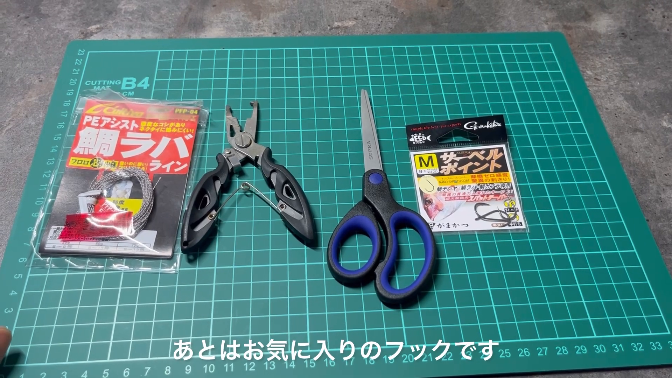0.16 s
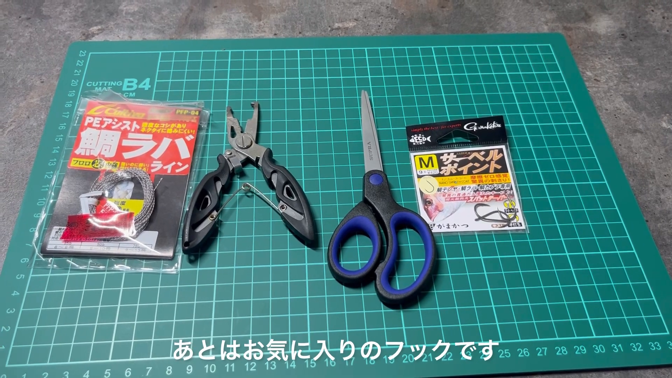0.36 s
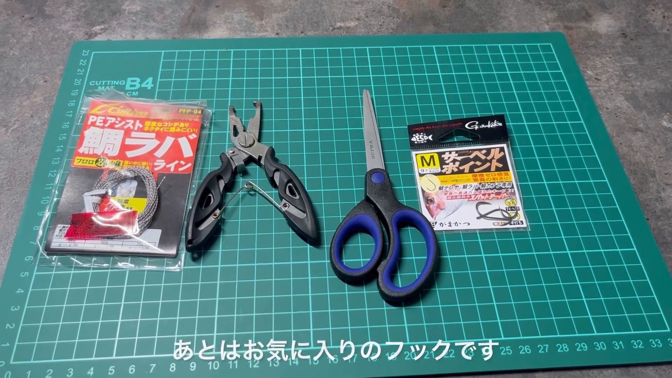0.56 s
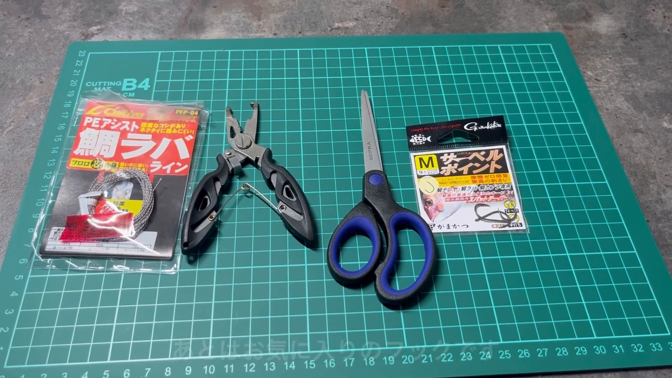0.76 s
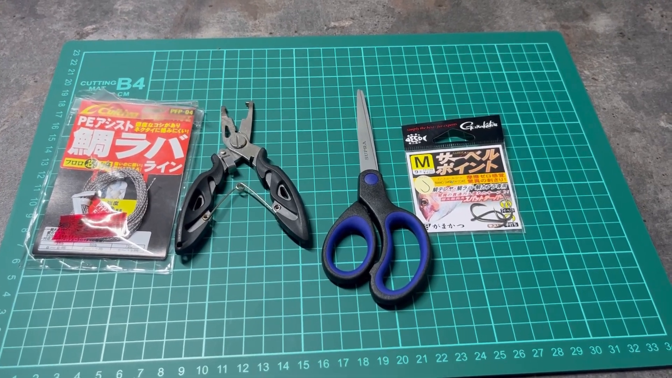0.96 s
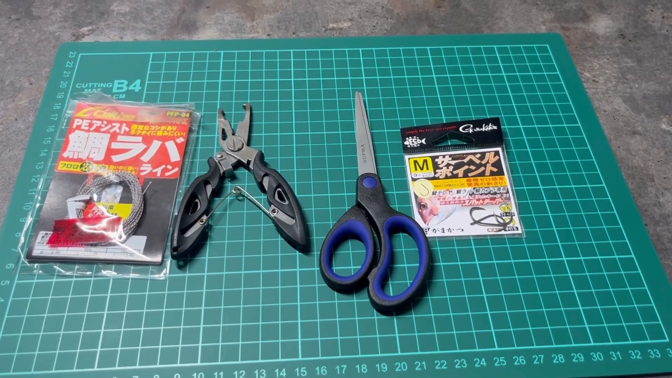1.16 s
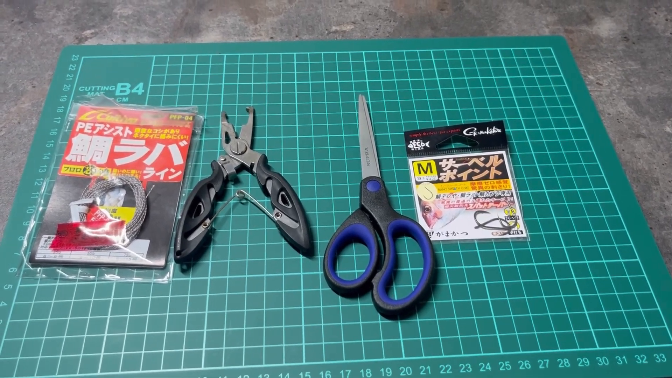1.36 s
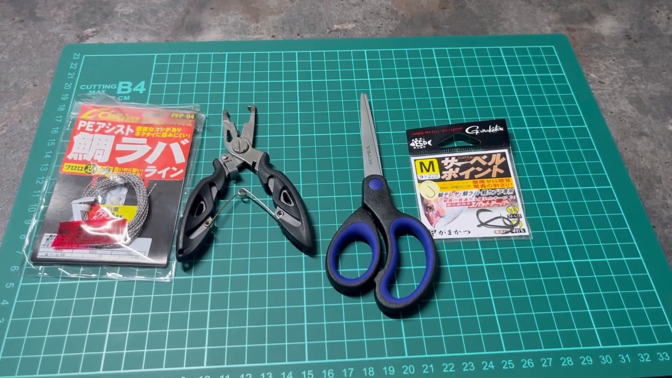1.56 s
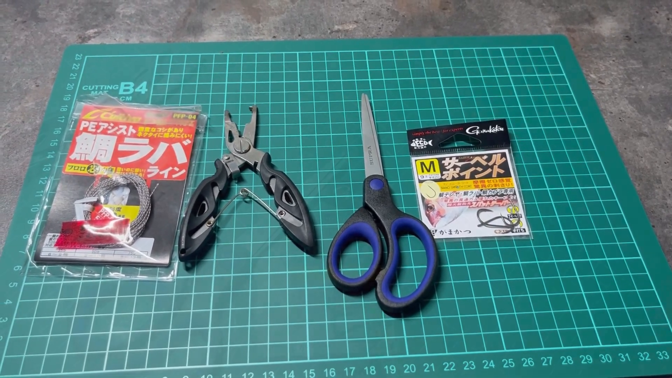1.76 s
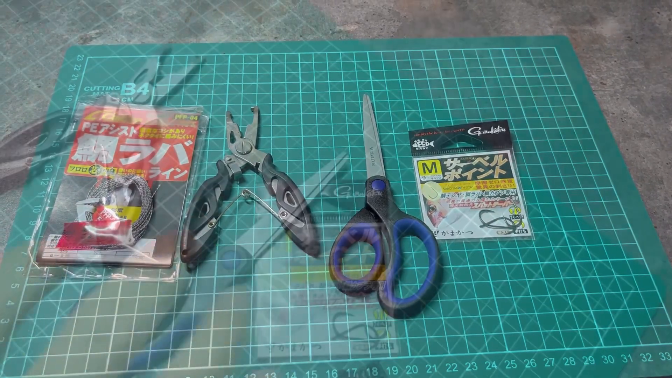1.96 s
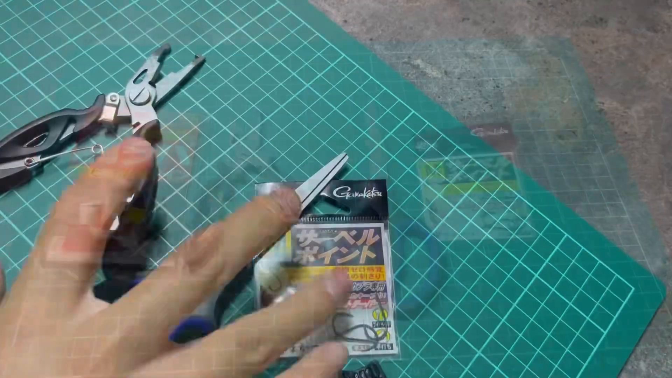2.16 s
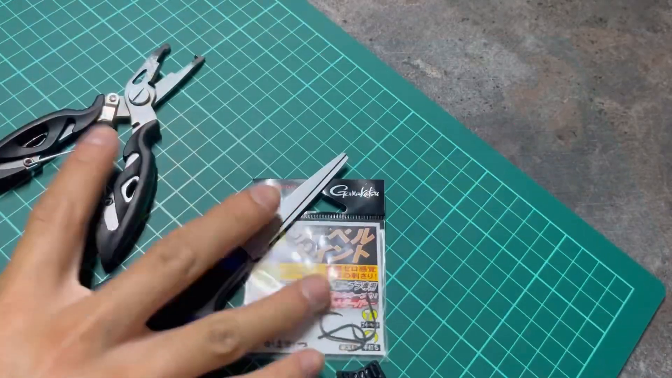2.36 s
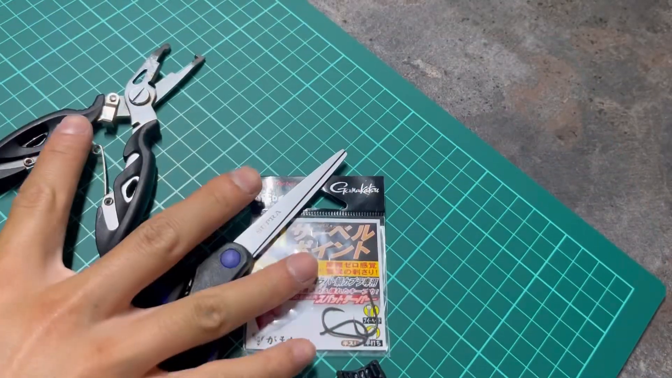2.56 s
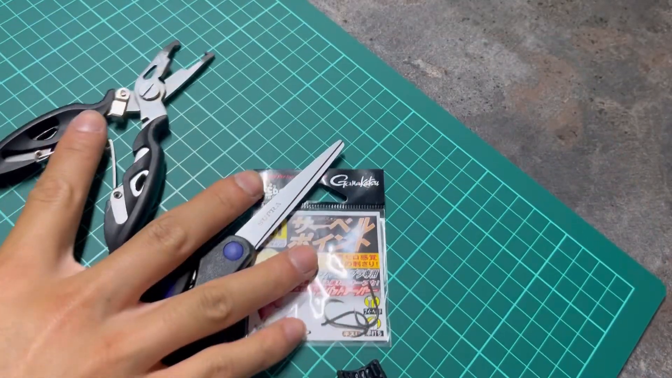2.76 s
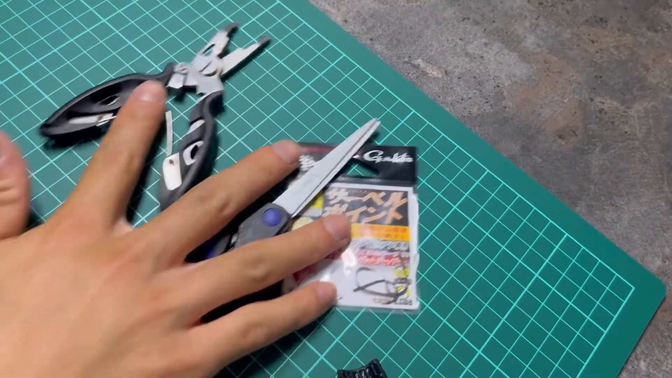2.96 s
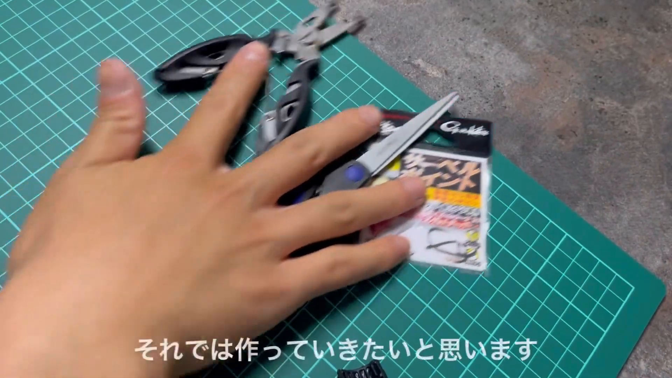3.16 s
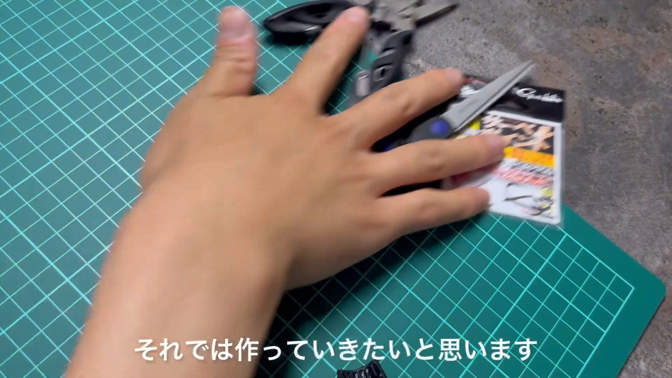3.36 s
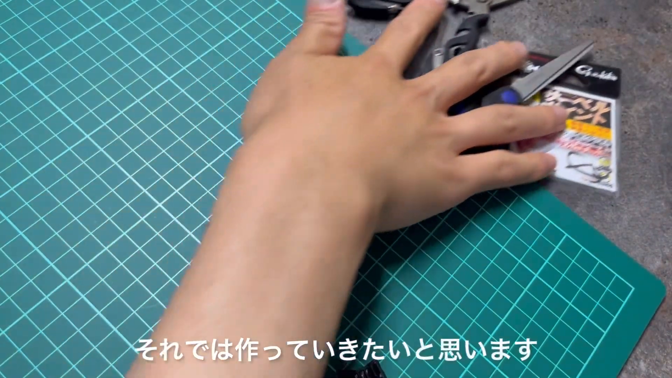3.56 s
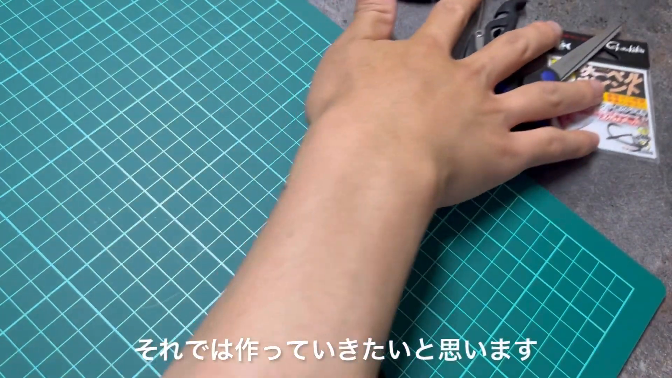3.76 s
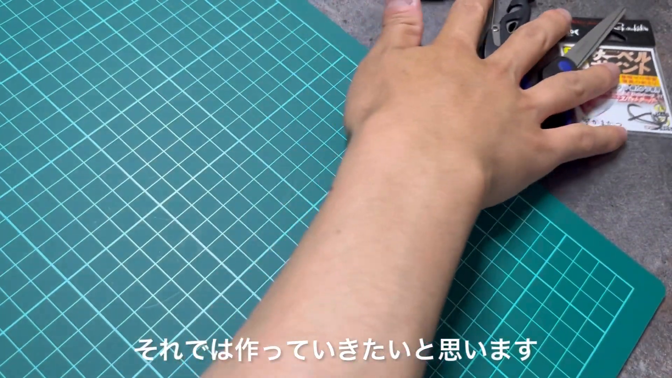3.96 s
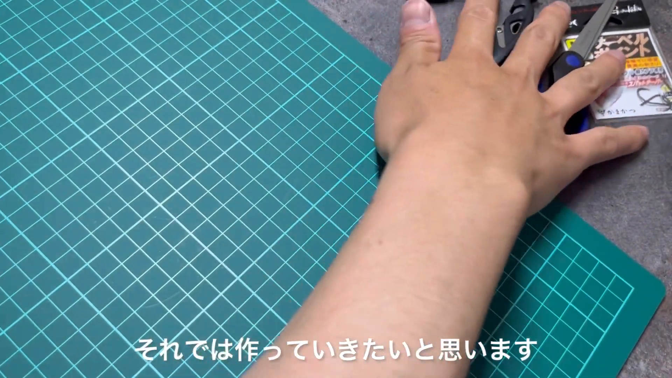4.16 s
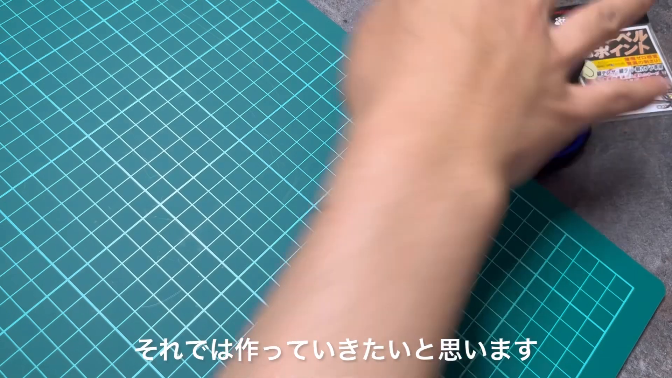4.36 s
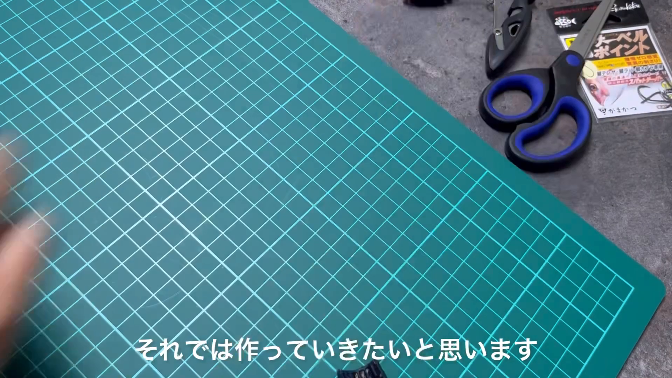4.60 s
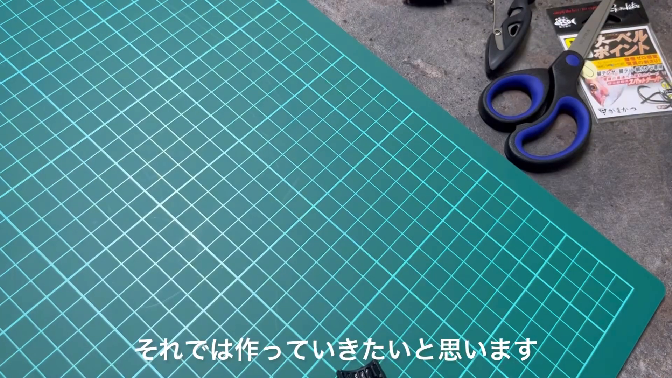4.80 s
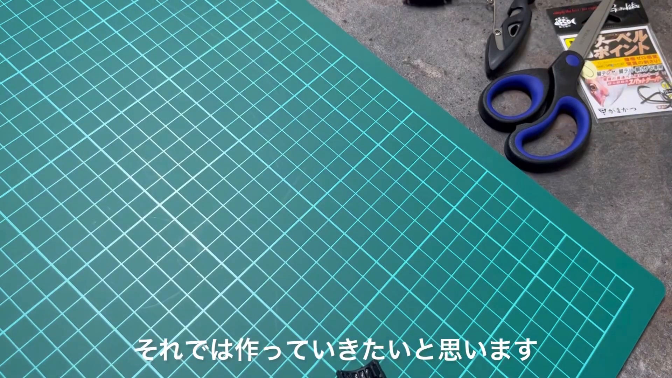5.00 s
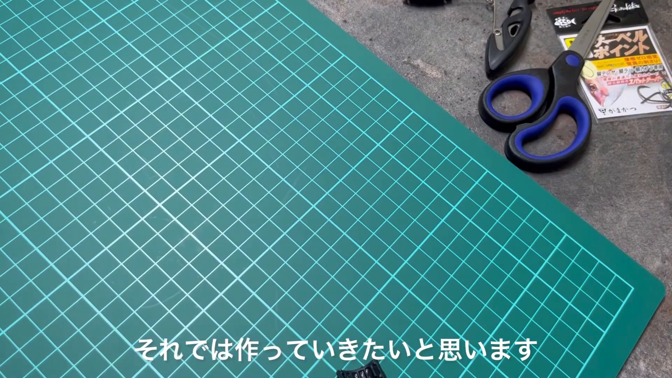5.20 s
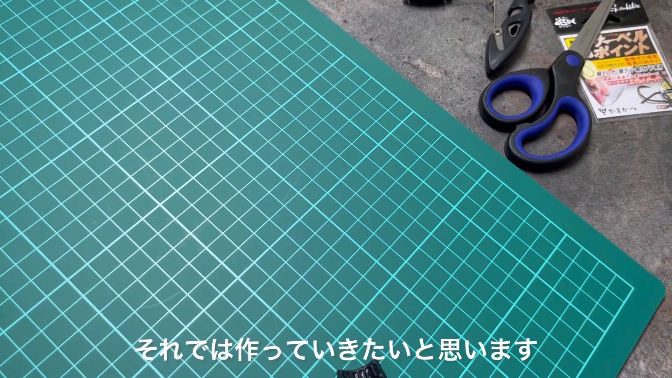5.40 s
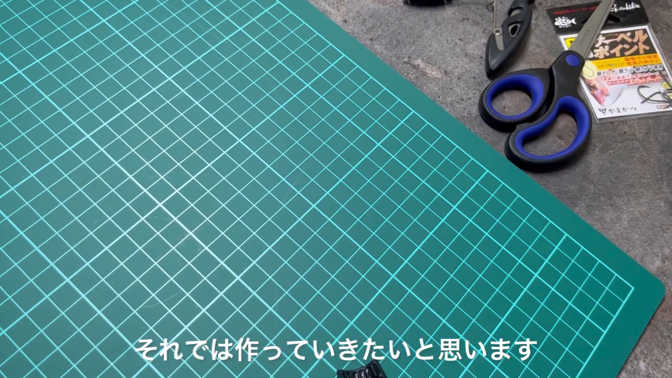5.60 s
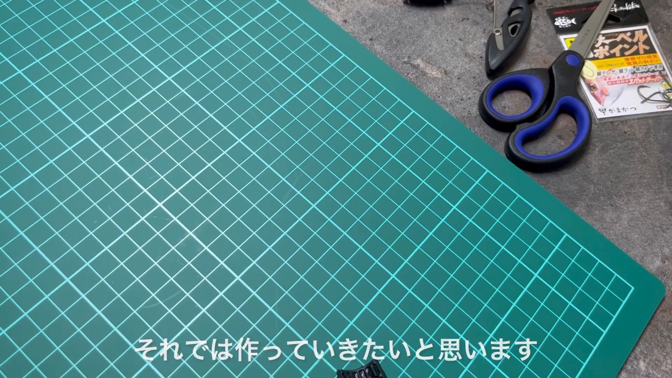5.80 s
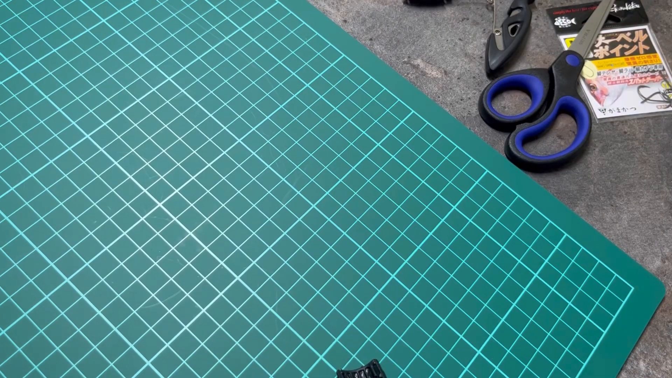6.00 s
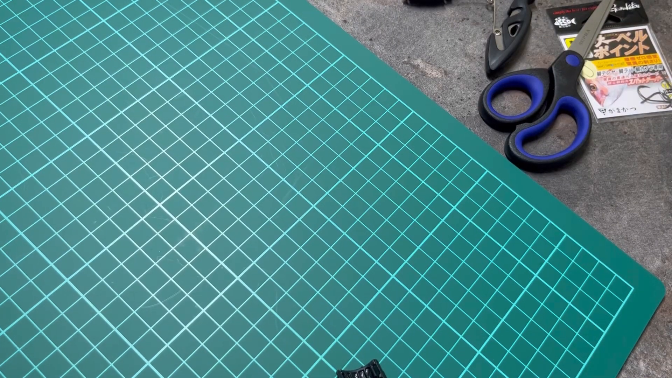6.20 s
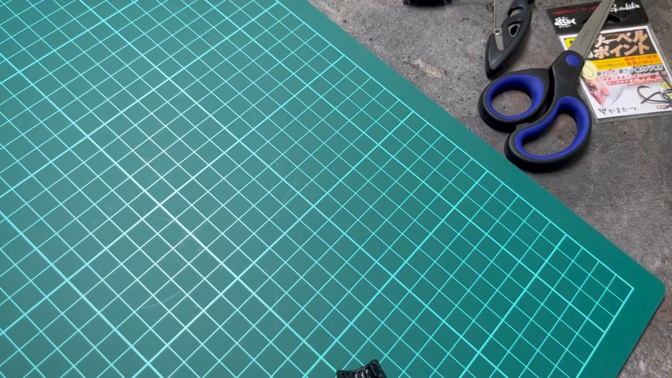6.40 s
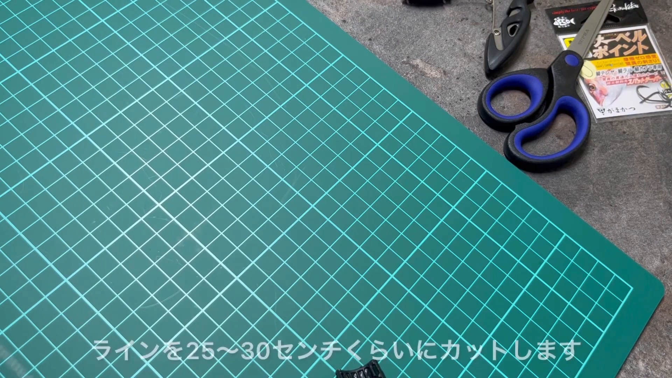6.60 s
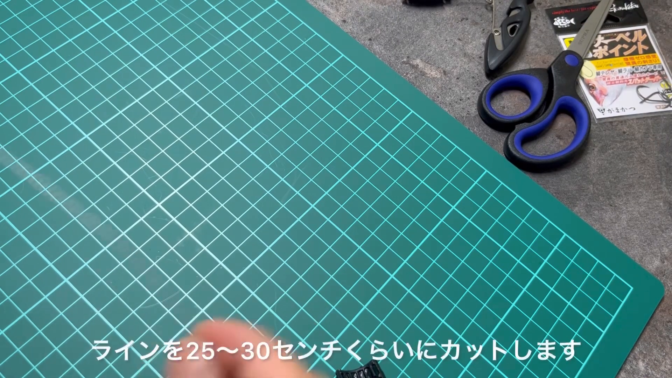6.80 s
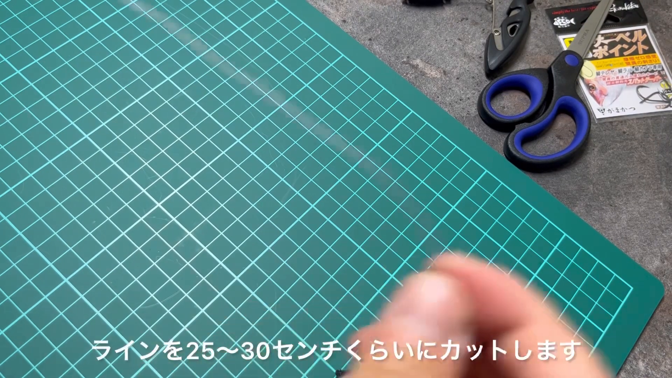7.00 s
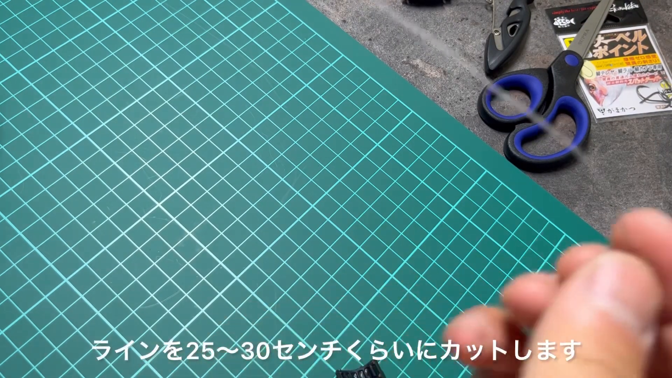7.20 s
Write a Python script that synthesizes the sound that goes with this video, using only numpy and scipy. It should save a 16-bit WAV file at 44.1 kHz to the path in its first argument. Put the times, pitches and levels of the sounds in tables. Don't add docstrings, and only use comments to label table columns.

```python
import sys
import numpy as np
from scipy import signal
from scipy.fft import rfft, irfft, next_fast_len
from scipy.io import wavfile

SR = 44100
rng = np.random.default_rng(int(sys.argv[2]) if len(sys.argv) > 2 else 0)


def dump(signal):
    limited = np.clip(np.atleast_2d(signal).T, -1, 1)
    pcm = np.round(limited * 32767).astype(np.int16)
    wavfile.write(sys.argv[1], SR, pcm)


def decibels_to_gain(level_db):
    exponent = np.asarray(level_db, float) / 20
    return 10 ** exponent


N = 319725

# time_s, hand_weight_db, slide_speed_db
PUSH = [
    (2.6, -75, -108),
    (2.76, -50, -74.5),
    (2.97, -42.5, -57),
    (3.3, -46, -52),
    (3.48, -30, -49),
    (3.74, -30.5, -58.5),
    (3.88, -37, -62.5),
    (3.96, -47.5, -76),
    (4.1, -64, -87.5),
]
PRESS_DB = -39
BOOM_GROWS, MAT_GROWS = 1.64, 0.35
# time_s, bite_db
BITE = [
    (3.3, -56.5),
    (3.35, -46.5),
    (3.44, -39.5),
    (3.6, -37),
    (3.64, -42.5),
    (3.68, -37.5),
    (3.88, -40),
    (4.11, -81),
]
# level_db, drift_db_per_s as they turn, light_touch_db, tilt_share
TOOL_PARTS = [
    (-5, -13, -14, 1),
    (-8, -6.5, -42, -0.17),
    (-5.5, 8.5, -3.5, -1.2),
]
# peak_s, rise_s, fall_s, level_db, tilt_db
NICKS = [
    (4.3, 0.1, .1, -51.5, 1.5),
    (6.63, 0.081, 0.09, -80, 16),
]
# start_s, peak_db
SKIPS = [(3.3444, -24.5), (3.352, -20), (3.3614, -27.5), (3.3825, -23.5), (3.3978, -22), (3.425, -16),
         (3.4361, -16.5), (3.4414, -24.5), (3.4504, -26.5), (3.4589, -19.5), (3.4669, -17), (3.4754, -22),
         (3.4832, -23.5), (3.4924, -22), (3.5019, -22), (3.5121, -19.5), (3.5188, -25.5), (3.5457, -25),
         (3.554, -28), (3.5683, -29.5), (3.628, -29.5), (3.6415, -25.5), (3.7558, -27), (3.7658, -24.5),
         (3.8838, -33)]
TURN_S = 3.535
# time_s, squeeze_0_to_1
CLAMP = [
    (3.42, 0),
    (3.48, 1),
    (3.58, 1),
    (3.66, 0),
]
# peak_s, rise_s, fall_s, level_db, boom_db
JOLTS = [
    (.34, 0.15, 0.11, -83.5, 16),
    (2.42, 0.15, 0.27, -62.5, -9.5),
    (3.16, 0.017, 0.092, -28, -13.5),
    (3.93, .15, .15, -59, 16.5),
    (4.16, 0.031, .07, -35.5, -2.5),
    (4.29, .08, 0.11, -41.5, -7.5),
    (4.77, 0.38, 0.31, -65, 2.5),
    (5.39, 0.18, 1, -67, 6.5),
    (5.96, 0.082, .15, -56.5, -3.5),
    (6.45, 0.68, 0.38, -73, 5),
]
# peak_s, rise_s, fall_s, level_db, film_db
RUSTLES = [(2.345, 0.018, 0.088, -67, -0.5), (2.53, 0.019, 0.15, -63, -42), (4.15, .012, 0.047, -35.5, -71),
           (4.29, 0.21, 0.08, -52, -17), (4.628, 0.035, 0.15, -54.5, -7.5), (5.45, .25, .4, -68, -25),
           (5.692, 0.022, .08, -46.5, -29), (5.924, 0.9, 1, -61, -9.5), (6.446, .015, .1, -60, -8),
           (6.55, .02, 0.093, -72.5, -6.5), (6.88, .1, 0.35, -95, 16), (7.15, 0.11, 0.198, -89.5, 6.5)]
# peak_s, rise_s, fall_s, level_db, lid_db
ROCKS = [
    (1.2, 0.18, 0.043, -62, -8),
    (1.456, 0.012, 0.014, -38.5, -21),
    (1.525, 0.036, 0.06, -34, -17),
    (1.632, .025, 0.043, -48.5, -16.5),
    (1.745, 0.024, 0.033, -49.5, -6.5),
    (1.782, 0.024, 0.029, -47.5, -2),
    (2.195, 0.077, 0.037, -61.5, -0.5),
]
# start_s, peak_db, ring_hz, edge_db
BLOWS = [(0.317, -61.5, 310, 2.5), (0.991, -52, 635, -24), (1.037, -55, 680, -30), (1.104, -54.5, 460, -4.5),
         (1.169, -44, 614, -39), (1.176, -47.5, 227, -40), (1.217, -58.5, 610, 2.5),
         (1.428, -51.5, 530, -30), (1.454, -36, 530, -37), (1.496, -32, 483, -33), (1.577, -45, 520, -29),
         (1.635, -51.5, 484, -34), (1.718, -46, 437, -22), (1.749, -43, 697, -37), (2.074, -52.5, 300, -41),
         (2.116, -45, 239, -17), (2.204, -45.5, 660, -7),
         (2.365, -50, 457, -0.5), (2.388, -45, 227, -2.5), (2.532, -37.5, 243, -1),
          (2.659, -50, 1050, -33), (3.147, -29, 434, -22), (3.16, -28, 274, -6), (4.144, -25, 265, -1),
          (4.635, -40.5, 1020, -14), (5.229, -55.5, 466, -1.5), (5.337, -53, 444, 5.5),
          (5.693, -34.5, 1250, -8), (5.909, -43, 920, -14), (6.335, -50.5, 249, 1.5),
          (6.444, -39.5, 458, -17)]
# start_s, peak_db, ring_hz, sparkle_db
SNAPS = [(2.203, -52.5, 4300, -38), (2.3379, -43.5, 2860, -13), (2.376, -39, 1240, -14.5),
         (2.4393, -43.5, 1520, -41), (2.5315, -37, 1600, -43), (2.6579, -42.5, 1230, -11.5),
         (2.6854, -49, 1770, -11), (4.146, -22, 2500, -42), (4.149, -29.5, 1134, -40.5),
         (4.2398, -35, 1460, -10.5), (4.6348, -32.5, 1670, -20), (5.3378, -33.5, 1720, -24),
         (5.5945, -35, 1490, -9), (5.681, -44, 1844, -25), (5.6945, -21.5, 3510, -30),
         (5.7046, -28.5, 1660, -13.5), (5.7154, -35, 1560, -29), (5.9095, -32, 1720, -7),
         (6.1624, -43.5, 1760, -6.5), (6.1963, -42.5, 2060, -18.5), (6.335, -42.5, 2160, -8),
         (6.3934, -45.5, 1860, -22), (6.4426, -32, 1890, -15.5)]
# start_s, peak_db, ring_hz, sparkle_db
BRUSHES = [(2.2966, -61, 1480, -21), (4.6012, -47.5, 2060, -7), (4.7942, -48.5, 1670, -15.5),
           (4.9287, -53.5, 1480, -3.5), (5.011, -59.5, 1480, 0.5), (5.102, -61, 1895, -24),
           (5.1397, -61.5, 3730, -22), (5.221, -50, 4240, 0.5), (5.4235, -44.5, 1510, -13),
           (5.6039, -36, 1330, -13), (5.864, -49, 3760, -2.5), (5.9528, -40, 1660, -6.5),
           (6.108, -50.5, 2120, -25), (6.215, -50, 2340, -28), (6.282, -48, 2060, -22),
           (.312, -62, 4000, -5)]
# start_s, end_s, pitch_hz, peak_db, t60_s
THRUM = (2.07, 2.165, 140, -39, .09)
# peak_s, rise_s, fall_s, level_db
THUDS = [
    (1.05, 0.12, .6, -68),
    (2.2, 0.1, 0.26, -54),
    (2.55, 0.035, 0.18, -52.5),
    (3.16, 0.029, 0.098, -50),
    (3.75, 0.89, 0.8, -61.5),
    (4.15, 0.077, 0.64, -62),
    (4.74, 0.071, 0.17, -56),
    (5.6, 0.61, 1.5, -60.5),
]
CUT_S = 6.51
RUMBLE_DB, HUSH_DB = -69.5, -76
LULL_S, LULL_WIDTH_S, LULL_DB = 1.96, 0.095, -7

# mode_hz, width_hz, level_db
TABLE = [(205, 22, -6.5), (372.5, 51, -5.5), (415.4, 24, 1.5), (488.1, 30, -1), (635, 110, -7),
         (697, 42, -4.5), (780, 64, -7.5), (1037, 210, -12.5)]
BOOM = [(108, 33, -4), (128.9, 4, 2.5), (136.7, 49, -7)]
DRONE = [(259.9, 19, 1), (331.2, 12.2, 1)]
# mode_hz, width_hz, level_db
MAT = [(1340, 620, 0.5), (1480, 434, 7.5), (1718, 640, 3), (2520, 1800, -3.5)]
# mode_hz, width_hz, level_db
JAWS = [(3250, 487, 0)]
SQUEEZED = [(3740, 990, 0)]
TIPS = [(5420, 570, 4.5), (7884, 1200, -1)]
HINGE = [(3860, 150, -10), (4290, 570, -4)]
BLADE = [(2400, 450, 0)]
GRIPS = [(1098, 120, 1.5), (1285, 110, 3), (1427, 70, 0)]
# mode_hz, width_hz, level_db
BOX = [(485, 110, -1.5), (565, 114, -1.5), (730, 45, 2)]
LID = [(1170, 200, 1), (1570, 150, 3.5), (1900, 280, -6), (2572, 110, -11.5)]
BASE = [(3480, 290, 1.5), (4400, 390, 3), (5500, 860, 3)]
# frequency_hz, level_db_per_hz
SCRAPE = [(1500, -27), (2500, -9.5), (3900, -8), (5900, -11.5), (7500, -7), (8600, -27), (10500, -49.5),
          (18000, -120)]
FILM = [(5000, -38.5), (8000, -8.5), (9700, 0.5), (11500, -6), (13200, -2.5), (14600, -13.5),
        (15500, -30.5)]
RUMBLE = [(13, -60), (32, -15), (57, 3.5), (76, 3.5), (97, -14), (130, -5.5), (170, -36.5), (290, -120)]
HUSH = [(59, -37.5), (100, -9), (293, -8.5), (467, -14), (998, -20.5), (1550, -24), (12600, -40.5),
        (15500, -39.5)]
# frequency_hz, t60_s
ROOM = [(200, 0.35), (2000, 0.28), (10000, 0.062)]
# frequency_hz, likeness_0_to_1
ALIKE = [(60, 0.87), (350, 0.86), (640, 0.76), (1400, 0.79), (2500, 0.29), (7500, 0.91), (9500, 0.93),
         (15000, .9)]
# frequency_hz, lead_rad
LEAD = [(60, 0), (350, -.2), (800, 1.6), (1500, 1.5), (4650, .5), (7800, -2.7), (9200, -3.6), (15000, -9.2)]


def unit(x):
    return x / np.sqrt(np.mean(x ** 2) + 1e-20)


def along(points, hz):
    f, v = np.transpose(points)
    return np.interp(np.log(hz + 1), np.log(f + 1), v)


def track(rows, rest):
    s, *columns = np.transpose(rows)
    return [np.interp(np.arange(N) / SR, s, column, rest, rest) for column in columns]


def strokes(rows, db=0, share=0):
    t = np.arange(0, N / SR + .002, .001)
    power = 0
    for s, rise, fall, level_db, *tone in rows:
        slope_db = np.where(t < s, (s - t) / rise, (t - s) / fall) * 20
        held = (t < CUT_S) | (s > CUT_S) | (s < CUT_S - 2)
        power = power + held * decibels_to_gain(level_db + db + share * sum(tone) - slope_db) ** 2
    return np.interp(np.arange(N) / SR, t, np.sqrt(power))


def filtered(x, response):
    m = next_fast_len(x.shape[-1] + 8192)
    fine = np.fft.rfftfreq(m, 1 / SR)
    coarse = np.linspace(0, SR / 2, 12000)
    gain = [np.interp(fine, coarse, row) for row in np.atleast_2d(response(coarse))]
    return irfft(rfft(x, m) * gain, m)[..., :x.shape[-1]]


def modes(table, power=1):
    low, top = min(table)[0], max(table)[0]

    def edges(f):
        above = 1 + 1j * f / (1.69 * top)
        below = 1 + 0.45 * low / (1j * f + 1)
        return (above * below) ** -2

    def response(f):
        total = 0
        for k, (center, width, db) in enumerate(table):
            damping = 1j * f * width
            total = total + (-1) ** k * decibels_to_gain(db) * damping / (center * center - f * f + damping)
        return edges(f) * total ** power

    return response


def shape(spectrum):
    return lambda f: decibels_to_gain(along(spectrum, f))


def friction(response, grit_db, grain_s, first=0, last=N):
    steps = np.arange(last - first) / SR / grain_s
    knots = rng.standard_normal(int(steps[-1]) + 2)
    grains = np.interp(steps, np.arange(len(knots)), knots)
    noise = decibels_to_gain(grit_db * grains) * rng.standard_normal((2, len(steps)))
    rub = unit(filtered(noise, response))
    return np.pad(rub, ((0, 0), (first, N - last)))


def burst(response, t60, crack, size=3072, rise=0):
    t = np.arange(size) / SR
    push = rng.standard_normal((2, size)) * decibels_to_gain(-60 * t / t60) * (t / (t + rise + 1e-9)) ** 2
    push[:, 0] += crack
    spectrum = rfft(push, 2 * size) * response(np.fft.rfftfreq(2 * size, 1 / SR))
    mid, side = irfft(spectrum)[:, :size]
    ring = mid + 0.15 * side * np.array([[1], [-1]])
    return ring / np.abs(ring).max()


def sides(pan_db):
    return decibels_to_gain(np.array([[pan_db / 2], [-pan_db / 2]]))


def add(out, s, x):
    out[:, round(s * SR):][:, :x.shape[1]] += x


def drag():
    weight_db, speed_db = track(PUSH, -130)
    extra_db = weight_db - PRESS_DB
    off_mat = np.clip((track(BITE, -110)[0] + 62) / 15, 0, 1)

    boom = decibels_to_gain(-54 + BOOM_GROWS * extra_db) + strokes(JOLTS, 2, 1)
    drone = decibels_to_gain(-41.5 + 0.93 * extra_db) + strokes(JOLTS, db=-.4)
    top = decibels_to_gain(-40 + 1.13 * extra_db) + strokes(JOLTS)
    table = boom * friction(modes(BOOM), grit_db=5, grain_s=.03)
    table += drone * friction(modes(DRONE, 2.09), grit_db=4, grain_s=0.027)
    table += top * friction(modes(TABLE), grit_db=4.5, grain_s=.015)

    hands = strokes(RUSTLES, db=-2)
    mat = decibels_to_gain(speed_db + 10.5 + MAT_GROWS * extra_db) + hands
    scrape = decibels_to_gain(speed_db + 3.5 - 3 * off_mat) + strokes(RUSTLES, db=2.0, share=0.8)
    film = decibels_to_gain(speed_db - 2.3 * off_mat) + strokes(RUSTLES, 0.42, 1)
    grit = mat * friction(modes(MAT), grit_db=2.0, grain_s=0.0063)
    packets = crackle(count=1800, hz=2037, spread=0.67, cycles=7.3, size_db=4.5)
    grit += decibels_to_gain(-11.0) * hands * (np.arange(N) > 4.5 * SR) * packets
    grit += scrape * friction(shape(SCRAPE), grit_db=2.5, grain_s=.004)
    grit += film * friction(shape(FILM), grit_db=2.0, grain_s=0.0032)
    return table + grit


def crackle(count, hz, spread, cycles, size_db):
    when, pitch, size, side = rng.random((count, 4)).T
    own_hz = hz * np.exp(spread * (2 * pitch - 1))
    turns = own_hz[:, None] * np.arange(400) / SR
    loudness = decibels_to_gain(-size_db * np.log(size + 0.00027))
    pops = loudness[:, None] * np.sin(2 * np.pi * turns) * decibels_to_gain(-60 * turns / cycles)
    index = (when * (N - 400)).astype(int)[:, None] + np.arange(400)

    def scatter(gain):
        return np.bincount(index.ravel(), (pops * np.reshape(gain, (-1, 1))).ravel(), N)

    return unit(np.array([scatter(1), scatter(2 * side - 1)]))


def grind():
    bite = decibels_to_gain(track(BITE, -130)[0] - 3.5)
    turned_s = np.arange(N) / SR - TURN_S
    squeeze = track(CLAMP, 0)[0]

    def slips(part):
        return friction(modes(part, 2), grit_db=4, grain_s=.003, first=3 * SR, last=7 * SR)

    jaws = np.sqrt(1 - squeeze) * slips(JAWS) + decibels_to_gain(-1.0) * np.sqrt(squeeze) * slips(SQUEEZED)
    out = (bite + strokes(NICKS)) * jaws
    for (db, drift, touch_db, share), part in zip(TOOL_PARTS, (HINGE, TIPS, BLADE)):
        out += (bite * decibels_to_gain(db + drift * turned_s) + strokes(NICKS, touch_db, share)) * slips(part)
    handles = decibels_to_gain(-52 + 1.3 * (track(PUSH, -130)[0] - PRESS_DB))
    return out + handles * slips(GRIPS)


def chatter():
    out = np.zeros((2, N + SR))
    for s, db in SKIPS:
        flat = s > TURN_S
        jaw_hz = 3350 + 350 * np.interp(s, *np.transpose(CLAMP))
        jaws = modes([(jaw_hz, 380, 3), (4270, 600, -5)], 2)
        air = modes([(10400, 1300, 0), (14500, 2600, 0.00022)])
        skip = burst(jaws, .006, crack=1.5, size=1500, rise=.0005)
        skip += decibels_to_gain(-13 + 13.2 * flat) * burst(modes(TIPS), 0.012, crack=1.8, size=1500)
        skip += decibels_to_gain(-22.5 + 21 * flat) * burst(air, .003, crack=2.6, size=1500)
        add(out, s, decibels_to_gain(db + 1.5) * skip * sides(1.5))
    return out[:, :N]


def knocks():
    out = np.zeros((2, N + SR))
    for s, db, hz, edge_db in BLOWS:
        own, under = modes([(hz, .25 * hz, 0)]), modes(DRONE + TABLE[1:])
        body = lambda f: own(f) + decibels_to_gain(-8.0) * under(f)
        t60 = .022 if s < THRUM[0] else .04
        blow = burst(body, t60, crack=8.0, rise=0.00011)
        blow += decibels_to_gain(edge_db) * burst(modes(LID), 0.018, crack=5.6)
        add(out, s, decibels_to_gain(db + 0.5) * blow)
    return out[:, :N]


def snaps(events, t60, crack, rise, bright_db):
    out = np.zeros((2, N + SR))
    for s, db, hz, sparkle_db in events:
        own, under = modes([(hz, .22 * hz, 0), (4200, 2500, bright_db)]), modes(MAT)
        body = lambda f: own(f) + decibels_to_gain(-18.0) * under(f)
        tick = burst(body, t60, crack, rise=rise)
        tick += decibels_to_gain(sparkle_db) * burst(shape(FILM), t60, crack / 4, rise=rise)
        add(out, s, decibels_to_gain(db - 2.5) * sides(3.8) * tick)
    return out[:, :N]


def nudge():
    end = 5 * SR // 2
    rock = strokes(ROCKS, db=-1.0) * friction(modes(BOX), grit_db=7, grain_s=.01, last=end)
    rock += strokes(ROCKS, -1.1, 1) * friction(modes(LID), grit_db=6, grain_s=0.0088, last=end)
    hiss = friction(modes(BASE, 2), grit_db=2, grain_s=.006, last=end)
    return rock + strokes(ROCKS, db=-16.5, share=1.1) * hiss


def thrum():
    start, end, hz, db, t60 = THRUM
    t = np.arange(N) / SR - start
    decay_db = 60 * np.clip(t - end + start, 0, 1) / t60
    level = np.clip(t / .012, 0, 1) * decibels_to_gain(db - decay_db)
    phase = 2 * np.pi * hz * t * (1.04 - .4 * t)
    overtone = 0.48 * decibels_to_gain(-60 * np.abs(t) / 0.18) * np.sin(1.6 * phase)
    return level * (np.sin(phase) + overtone)


def quiet():
    lull = decibels_to_gain(LULL_DB * np.exp(-((np.arange(N) / SR - LULL_S) / LULL_WIDTH_S) ** 2))
    footing = decibels_to_gain(RUMBLE_DB) * lull + strokes(THUDS)
    rumble = footing * friction(shape(RUMBLE), grit_db=-1.0, grain_s=0.17)
    return rumble + decibels_to_gain(HUSH_DB - 1.0) * lull * friction(shape(HUSH), grit_db=0.0, grain_s=0.15)


def room(x):
    hz, t, z = signal.stft(rng.standard_normal((2, SR // 2)), SR, nperseg=256)
    decay = decibels_to_gain(-60 * t / along(ROOM, hz)[:, None])
    tail = signal.istft(z * decay, SR, nperseg=256)[1]
    delayed = np.pad(x, ((0, 0), (250, 0)))
    return signal.fftconvolve(delayed, tail / np.linalg.norm(tail[0]), axes=1)[:, :N]


def ports(pair):
    def turn(hz):
        return np.arccos(np.clip(along(ALIKE, hz), -1, 1)) / 2

    mid, side = filtered(pair, lambda hz: np.array([np.cos(turn(hz)), np.sin(turn(hz))]))
    return np.array([mid + side, mid - side])


def scene():
    ticks = snaps(SNAPS, t60=0.018, crack=2.5, rise=0, bright_db=-14.5)
    brushes = snaps(BRUSHES, t60=0.07, crack=0, rise=0.004, bright_db=-15)
    hits = knocks() + ticks + brushes + chatter()
    rubbing = sides(0.37) * ports(drag() + nudge() + grind() + quiet())
    handling = np.arange(N) / SR < CUT_S
    return rubbing + (hits + decibels_to_gain(-8.5) * room(hits)) * handling + thrum()


def top_cut(x):
    return signal.sosfilt(signal.butter(12, 15780, fs=SR, output="sos"), x)


def record(dry):
    heard = filtered(dry, lambda hz: np.exp(.5j * np.outer([1, -1], along(LEAD, hz))))
    return top_cut(heard)


dry = scene()
out = record(dry)
dump(out)
```